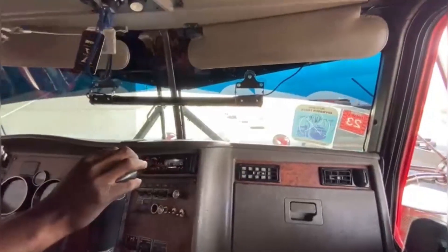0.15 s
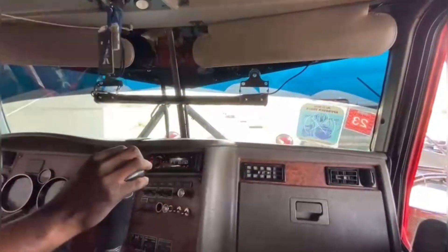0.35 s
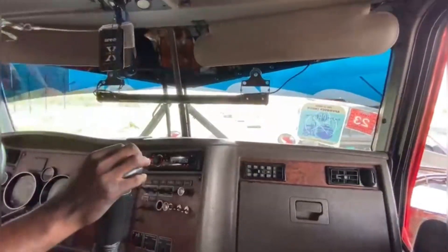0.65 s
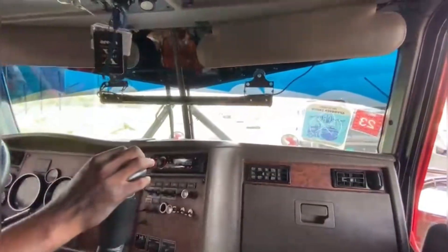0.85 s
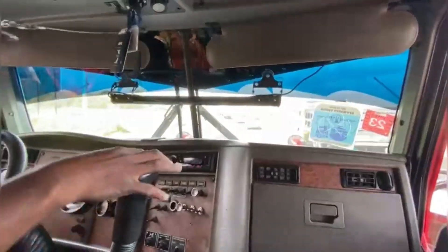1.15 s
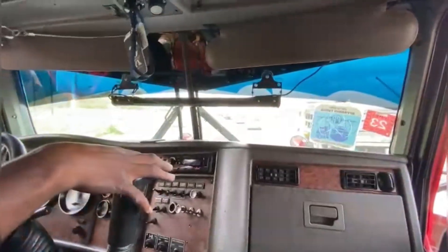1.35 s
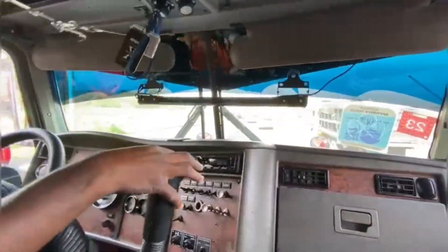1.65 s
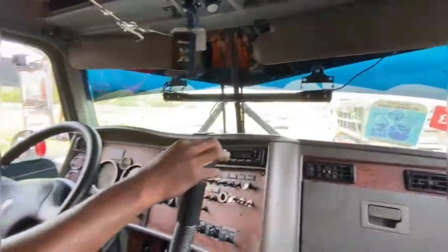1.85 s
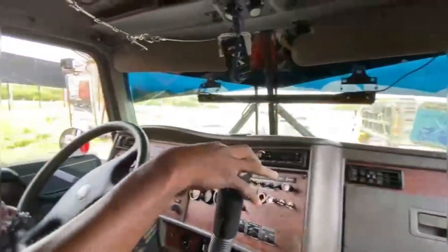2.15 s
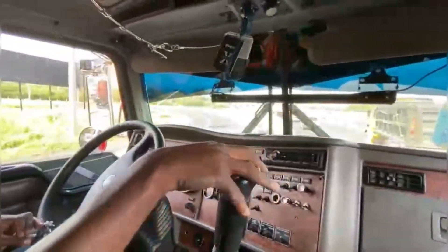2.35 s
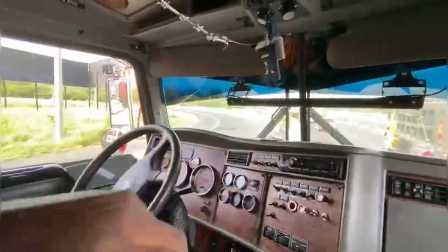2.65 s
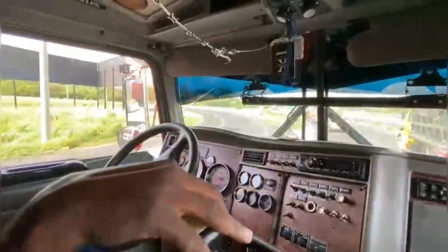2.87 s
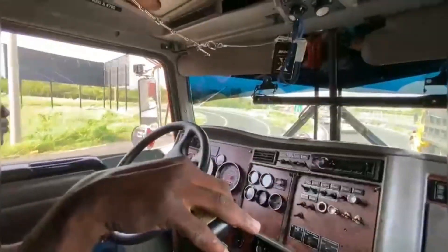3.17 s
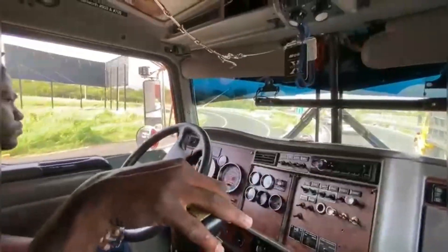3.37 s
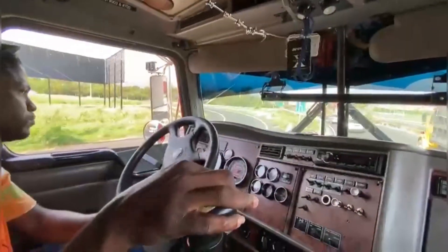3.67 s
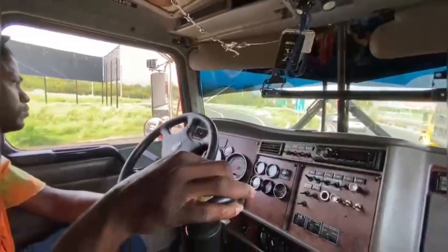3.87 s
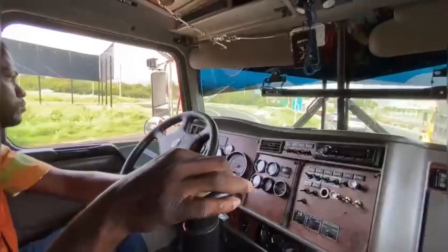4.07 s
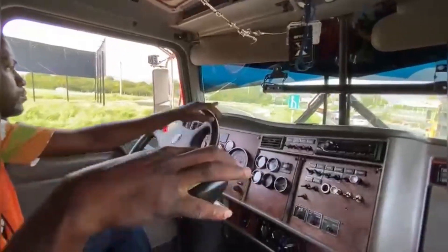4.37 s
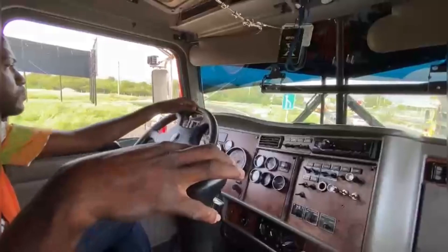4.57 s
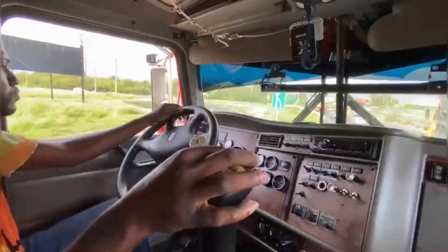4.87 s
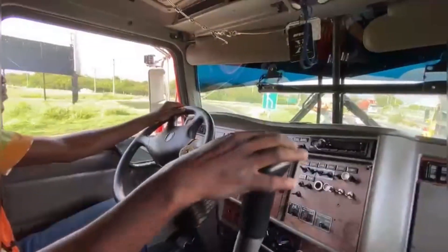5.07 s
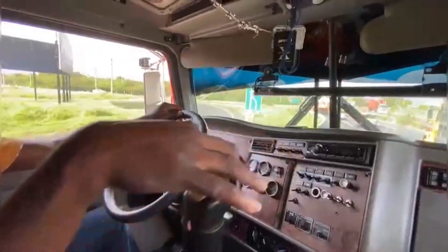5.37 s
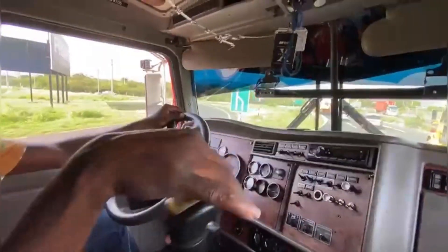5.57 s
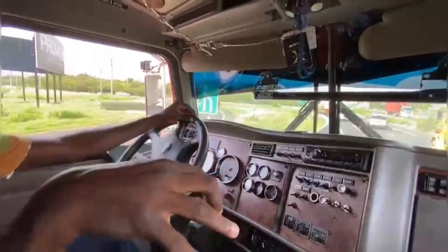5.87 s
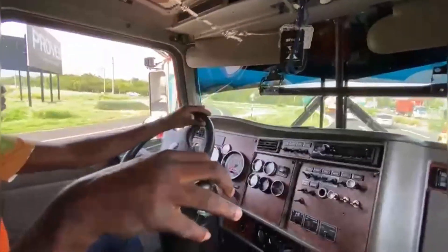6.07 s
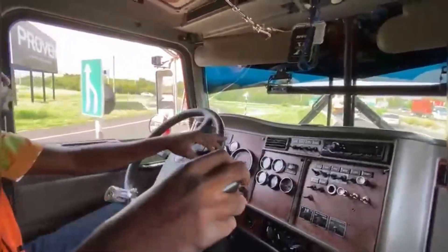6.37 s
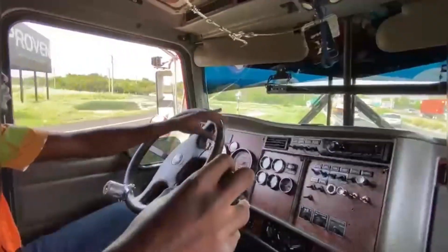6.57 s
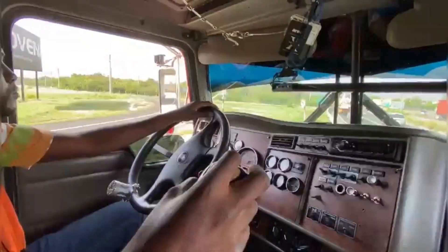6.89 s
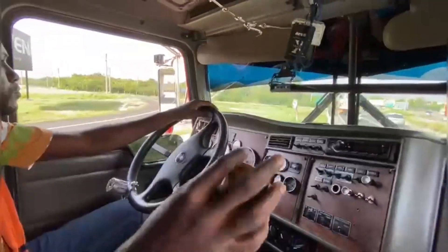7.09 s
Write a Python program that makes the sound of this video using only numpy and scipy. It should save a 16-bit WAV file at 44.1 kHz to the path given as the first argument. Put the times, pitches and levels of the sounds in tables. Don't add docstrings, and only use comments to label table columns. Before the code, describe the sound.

From inside the cab, a heavy diesel truck pulls away through its gears, roaring and booming, with turbo whistle, driveline knocks and air puffs.

```python
import sys
import numpy as np
from scipy import signal
from scipy.fft import rfft, irfft, next_fast_len
from scipy.io import wavfile
from scipy.ndimage import uniform_filter1d, minimum_filter1d

SR = 44100
rng = np.random.default_rng(int(sys.argv[2]) if len(sys.argv) > 2 else 0)


def master_out(mix):
    frames = np.transpose(np.atleast_2d(mix))
    ceiling = np.clip(frames, -1, 1)
    pcm = np.round(ceiling * 32767).astype(np.int16)
    wavfile.write(sys.argv[1], SR, pcm)


def voltage_ratio(level):
    return 10 ** (np.asarray(level, float) / 20)


N = 318843


def rms_one(x):
    return x / np.sqrt(np.mean(np.abs(x) ** 2) + 1e-20)


def in_time(rows):
    s, *columns = np.transpose(rows)
    return [np.interp(np.arange(N) / SR, s, column) for column in columns]


def drift(rate_hz):
    r = np.exp(-80 * np.pi * rate_hz / SR)
    slow = signal.lfilter([1], [1, -2 * r, r * r], rng.standard_normal(N // 40 + 2002))[2000:]
    return np.interp(np.arange(N) / 40, np.arange(len(slow)), rms_one(slow))


def ramp(at_s, length_s):
    reach_s = abs(length_s) * 0.75
    return np.interp(np.arange(N) / SR, [at_s - reach_s, at_s + reach_s], [0, 1])


def held(start_s, length_s, fade_s):
    return ramp(start_s, fade_s) - ramp(start_s + length_s, fade_s)


def spells(rows, fade_s):
    return sum(voltage_ratio(db) * held(s, length, fade_s) for s, length, db in rows)


WALL_ENDS_S = 1.0


def wall_near():
    return 1 - ramp(WALL_ENDS_S, 0.44)


# pitch_hz [Hz], lead_rad [rad]
LEAD = [(0, -1), (350, -1.6), (700, -3.2), (1200, -3.3), (1900, -1.3), (2900, 2.6), (3450, 3.2), (4000, 6),
        (4700, 6.4), (5200, 9.1), (5850, 10), (6300, 12.3), (7000, 12.7), (9000, 22), (10200, 18.8)]
# pitch_hz [Hz], left_minus_right_db [dB]
TILT = [(60, -28), (110, -12), (190, -7), (340, -7.5), (610, -3.5), (1100, -4), (1970, -4), (3520, -2.5),
        (5800, -3), (6600, -0.5), (7400, -11), (9000, -10.5), (11300, -5)]
# pitch_hz [Hz], shared_power [0 to 1]
ALIKE = [(40, 0.37), (125, 0.9), (300, 0.41), (700, 0.44), (2000, 0.15), (2600, 0.39), (4400, 0.52),
         (4850, 0.4), (5500, 0.55), (6550, 0.88), (7300, 0.28), (9000, 0.15), (10300, 1), (11500, 0.28)]


def coloured(spectrum):
    size = next_fast_len(N)
    hz = np.maximum(np.arange(size // 2 + 1) * SR / size, 1)

    def on_log(points):
        point_hz, value = np.transpose(points)
        return np.interp(np.log(hz), np.log(point_hz), value)

    shared, left, right = rfft(rng.standard_normal((3, size))) * voltage_ratio(on_log(spectrum))
    alike = np.clip(on_log(ALIKE), 0, 1)
    lead = np.exp(1j * np.interp(hz, *np.transpose(LEAD)))
    left = voltage_ratio(on_log(TILT)) * (np.sqrt(alike) * shared * lead + np.sqrt(1 - alike) * left)
    right = np.sqrt(alike) * shared + np.sqrt(1 - alike) * right
    pair = irfft([left, right], size)[:, :N]
    return pair / np.sqrt(np.mean(pair.mean(axis=0) ** 2))


def order(turn, level_db, left_db, lead, wander_db, slip, rate):
    angle = turn + slip * drift(rate)
    size = np.sqrt(2) * voltage_ratio(level_db + wander_db * drift(rate))
    left = voltage_ratio(left_db + wander_db * drift(rate)) * np.sin(angle + lead)
    return size * np.array([left, np.sin(angle)])


def whistle(pitch_hz, level_db, width_hz, left_db):
    low = signal.butter(2, width_hz / 2, fs=SR, output="sos")
    band = signal.sosfilt(low, rng.standard_normal((2, N)) + 1j * rng.standard_normal((2, N)))
    tone = (rms_one(band) * np.exp(2j * np.pi * np.cumsum(pitch_hz) / SR)).real
    return np.sqrt(2) * voltage_ratio(level_db) * tone * voltage_ratio([[left_db], [0]])


# firing_multiple [x
# firing rate], start_s [s], length_s [s], lift_db [dB]
ORDER_SPELLS = [(3, 3.62, 0.72, 8), (2, 6.36, 0.23, 10), (5.333, 0.7, 0.27, 15), (4, 5.5, 0.23, 13),
                (4, 1.69, 0.17, 4), (6.333, 6.45, 0.7, 8), (3, 5.6, 0.11, 10.5), (3, 0.8, 0.14, 6),
                (1, 2.885, 0.086, 5.5), (2.667, 1.84, 1.88, 7), (6, 1.8, 0.18, 6), (5, 1.25, 0.52, 7.5),
                (3, 4.38, 0.5, -9.5), (2, 0.816, 0.097, -18), (2, 4.2, 0.41, 3.5), (6.333, 3.3, 0.95, 6),
                (1.667, 4.3, 0.51, 16.5), (4, 5.2, 1.1, 1), (6, 1.45, .4, 3), (6.667, 1.5, 0.29, 11),
                (7, 1.5, 0.2, 13), (6, 3.65, 0.3, 9), (6, 4.1, 0.27, 0), (6, 6.85, .5, 7.5),
                (5, 6.5, .8, 7), (4, 6.9, .4, 5), (3, 6.9, .4, 4), (3.5, 6.25, 0.58, 8),
                (3.667, .6, 0.47, 8.5), (5.333, -0.24, 0.57, 6), (6.333, 4.5, 0.53, 3), (2, 6.7, 0.32, 4.5),
                (3.667, 5, .15, 9), (5, 0, 0.42, -8), (5, 5.5, .4, -8), (6, 4.45, 0.42, -5),
                (4, 0.6, 0.24, -5.5), (5, 2.8, .4, -5), (4, 2.05, .25, 7), (1.5, 1.5, 0.28, 8),
                (2, 0.5, 0.39, 3), (5, 6.12, .15, 9), (7, 3, 0.6, 6), (1, 6.5, 0.18, -5),
                (2.667, 4.5, 0.57, 4), (1, 4.5, 0.071, 4), (1, 3.0, 0.23, -4),
                (6.333, .55, .2, 4), (6.333, 1.2, .7, 4.5), (1.5, 1.78, 0.55, 12), (2.5, 1.82, 0.44, 8),
               (3.5, 1.9, 0.43, 10), (5, 1.75, .3, -9), (5.333, 6.1, .22, 9), (5.333, 6.68, .3, 4),
               (3.333, 8.1, .7, 8), (4, 6.1, .3, 5), (5, 6.9, .2, 6.5), (6, 6.25, .2, 9),
               (4.333, 1.9, .3, 3), (3.333, .6, .5, 2.5),
                (5, 6.15, 1.2, 3), (5, 1.3, .42, 3), (3, 4.1, .27, 2), (4, 1.17, .15, -3), (4, 6.0, .85, 2),
               (3, .88, .18, 3), (4, 3.65, .25, -3), (5.333, 0, .25, 3), (3, 7.0, .3, 2.5),
               (1, 1.98, .2, -2.5), (6, 2.35, .9, -6), (6.333, 2.35, .9, -6)]


def order_lift(multiple):
    return sum(db * held(s, length, fade_s=0.06)
               for m, s, length, db in ORDER_SPELLS
               if round(6 * m) == round(6 * multiple))


# load_share [dB per dB], fuel_share [dB per dB]
FOLLOWS = [(1.19, 0.01), (1.38, 0.18), (0.6, 1.52), (1.1, 0.7), (1.8, 0.41)]
# pitch_hz [Hz], width_hz [Hz], ahead_db [dB], aside_db [dB]
CAB_MODES = [(81.2, 102, -9, -6.5), (123.8, 31.5, -6, 1), (144, 1.8, -18, -25), (163.8, 20, -9, -15.5),
             (180.2, 33, -15, -7.5), (225.8, 20.4, -39, -11), (241.3, 35.3, -22, -12.5),
             (263, 29, -22, -27.5), (300.8, 16.2, -17.5, -17), (327.5, 25, -14.5, -20),
             (356.3, 26.2, -20, -6.5), (443, 130, -25.5, -31.5)]
# left_minus_right_db [dB], left_lead_rad [rad]
AHEAD = [(-11, -1.13), (-15.5, -2.08), (0.5, -1.76), (-12.5, 1), (-8, -2.2)]
# left_minus_right_db [dB], left_lead_rad [rad]
ASIDE = [(-10.5, -1.04), (-5.5, -3), (-5, -1.24), (-12, 1.5), (-7, -2.5)]


def firing(turn, firing_hz, load_db, fuel_db):
    out = 0
    turned = ramp(2.63, 0.73)
    for k, ((load, fuel), ahead, aside) in enumerate(zip(FOLLOWS, AHEAD, ASIDE), start=1):
        size = 0
        for hz, width, ahead_db, aside_db in CAB_MODES:
            facing = voltage_ratio(ahead_db) + (voltage_ratio(aside_db) - voltage_ratio(ahead_db)) * turned
            size = size + facing / (1 + (2 * (k * firing_hz - hz) / width) ** 2) ** 2
        level_db = 20 * np.log10(size) + load * load_db + fuel * fuel_db + order_lift(k)
        left_db, lead = (a + (b - a) * turned for a, b in zip(ahead, aside))
        out = out + order(k * turn, level_db, left_db, lead, wander_db=1.5, slip=0.088, rate=18.6)
    return out


# firing_multiple [x firing rate], level_db [dB], left_minus_right_db [dB], left_lead_rad [rad]
MINOR = [(.5, -40, -10, -.7), (1.5, -33, -9, -.9), (1.667, -36, -11, 2.3), (2.5, -33, -10, -1.7),
         (2.667, -28, -10, -1.7), (2.833, -33, -8, -1.3), (3.333, -33, -10, .8), (3.5, -33, -10, 1.2),
         (3.667, -31, -10, .7), (4.333, -36, -6, 1.4), (4.5, -38, -7, 2.5), (5.333, -33, -9, -2.6),
         (6, -36, -7, -1.5), (6.333, -39, -5, .2), (6.667, -42, -5, .3), (7, -42, -5, -.4)]
# pitch_hz [Hz], width_hz [Hz], lift_db [dB]
BOOMS = [(225, 26, 5), (285, 4, 6.5), (427, 39, 11), (512.7, 52, 10)]


def uneven_cylinders(turn, firing_hz, rumble_db, growl_db):
    out = 0
    for multiple, level_db, left_db, lead in MINOR:
        exact = round(6 * multiple) / 6
        trend_db = rumble_db + 17.0 if multiple < 4 else 1.47 * (growl_db + 17.5) - 3.0
        boom_db = sum(db / (1 + (2 * (exact * firing_hz - hz) / width) ** 2) for hz, width, db in BOOMS)
        total_db = level_db + trend_db + boom_db + order_lift(exact)
        out = out + order(exact * turn, total_db, left_db, lead, wander_db=1.3, slip=0.35, rate=3.0)
    return out


# pitch_hz [Hz], density_db [dB per Hz]
CAB = [(20, -28), (35, -45), (50, 4), (70, 5), (120, 6), (200, -2), (300, 3.5), (380, -5), (500, -36.5)]
BLOCK = [(250, -6.5), (340, 6), (410, 0.5), (460, -1.5), (520, -2.5), (650, -2.5), (835, -6.5), (950, -16),
         (1200, -40.5)]
CLATTER = [(600, -46), (850, 1), (1050, 5.5), (1220, 3.5), (2100, -2), (2600, -4.5), (2950, -7),
           (3600, -128)]
INTAKE = [(2300, -45.5), (3000, 3.5), (3560, 2), (4460, -2), (5100, -4), (5420, -7), (5750, -2), (6100, -8),
          (6500, -3.5), (7100, -3.5), (7650, -8), (8300, -3.5), (10000, -14), (11500, -65), (11850, -53)]
# start_s [s], length_s [s], lift_db [dB]
SURGES = [(1.55, 0.4, -0.5), (3.9, 0.035, -0.5), (6.45, 0.57, 1), (4.4, 0.22, 0), (5.6, 0.31, -0.5),
          (2.45, .5, -1.5), (3.03, 0.083, 1.5), (3.13, .1, -1.5), (4.58, .06, 2)]


def body_noise(turn, rumble_db, growl_db, fuel_db):
    wall = wall_near()
    clatter_db = -32.5 + 0.42 * fuel_db + 5 * wall
    clatter_db += sum(db * held(s, length, fade_s=0.066) for s, length, db in SURGES)
    hiss_db = -37 + 0.6 * fuel_db + 3 * wall
    layers = [(CAB, rumble_db - 9, 0, 1.5), (BLOCK, growl_db - 5.5, 0.1, 1.2),
              (CLATTER, clatter_db, 0.1, 0.6), (INTAKE, hiss_db, 0.06, 0.9)]
    out = 0
    for spectrum, level_db, beat_depth, flicker_db in layers:
        beat = 1 + beat_depth * (np.cos(turn) + np.cos(turn / 3))
        out = out + voltage_ratio(level_db + flicker_db * drift(17.0)) * beat * coloured(spectrum)
    return out


# time_s [s], pitch_hz [Hz], level_db [dB]
TURBO = [(0, 4950, -37), (.5, 5800, -39), (1.25, 7030, -43.5), (1.7, 8150, -46), (2.2, 9300, -56),
         (2.3, 8750, -46), (2.42, 8250, -38.5), (2.55, 7850, -45), (2.7, 7150, -45), (2.92, 6850, -42),
         (3.15, 6550, -45), (3.55, 6550, -47), (3.7, 7000, -55), (3.8, 7800, -54), (4.5, 8150, -49),
         (5.03, 8400, -50), (5.09, 7100, -44), (5.25, 6700, -42), (5.6, 6300, -49), (6.1, 6150, -65),
         (6.35, 6650, -38.5), (7.23, 8070, -45)]


def turbo():
    pitch_hz, level_db = in_time(TURBO)
    return voltage_ratio(3) * whistle(pitch_hz, level_db, width_hz=520, left_db=-10)


# pitch_hz [Hz], width_hz [Hz], level_db [dB]
WALL_BANDS = [(2062, 690, -25.5), (825.5, 130, -27.5), (3454, 390, -35), (4650, 760, -38)]


def wall_echo():
    bands = sum(whistle(np.full(N, hz), db + 0.8 * drift(12.0), width, left_db=-2.5)
                for hz, width, db in WALL_BANDS)
    return wall_near() * bands


# time_s [s], level_db [dB], rise_s [s], fall_s [s]
PUFFS = [
    (1.97, -33, 0.014, 0.049),
    (4.61, -44, .01, 0.026),
    (6.6, -44, .01, 0.017),
    (6.915, -28.5, 0.018, 0.046),
    (6.972, -23.5, 0.0057, 0.026),
]
# pitch_hz [Hz], density_db [dB per Hz]
VALVE = [(2000, -30), (3400, -12), (4650, 4.5), (5700, -13), (6600, -1.5), (8300, -5.5), (10300, -4),
         (11700, -12)]


def air_valves():
    t, shape = np.arange(N) / SR, np.zeros(N)
    for s, level_db, rise, fall in PUFFS:
        shape += voltage_ratio(level_db) * np.exp(-np.abs(t - s) / np.where(t < s, rise, fall))
    return shape * coloured(VALVE) * voltage_ratio([[-5], [1.5]])


# time_s [s], peak_db [dB]
KNOCKS = [(2.993, -35), (3.04, -27), (3.073, -16.5), (3.105, -21), (3.148, -36), (3.17, -26), (3.222, -40)]
# pitch_hz [Hz], level_db [dB], t60_s [s]
CASING = [(680, -4.5, 0.082), (857, -3.5, 0.059), (1054, 0.5, 0.096), (1255, -3, 0.047)]


def knocks():
    out, strengths_db = np.zeros(N), rng.normal(0, 2.1, (len(KNOCKS), len(CASING)))
    t = np.arange(4000) / SR
    for (s, peak_db), own_db in zip(KNOCKS, strengths_db):
        ring = sum(voltage_ratio(db + extra - 60 * t / t60) * np.sin(2 * np.pi * hz * t)
                   for (hz, db, t60), extra in zip(CASING, own_db))
        soft_onset = 1 - np.exp(-t / 0.0023)
        out[round(s * SR):][:len(t)] += voltage_ratio(peak_db - 4.0) * ring * soft_onset
    return out * voltage_ratio([[0], [-4]])


# start_s [s], length_s [s], level_db [dB]
SQUEAK = [(0, 1.1, -44.5), (1.35, 0.37, -50), (3.51, .06, -39), (3.6, 0.12, -44), (3.74, 0.11, -39.5),
          (3.84, 0.09, -48), (4.0, 0.14, -44), (4.15, .2, -48), (4.385, 0.16, -45), (4.7, 0.055, -47)]


def squeak():
    turn = 2 * np.pi * 3494 * np.arange(N) / SR
    tone = order(turn, level_db=-3, left_db=-1, lead=0, wander_db=3.0, slip=0.9, rate=18.0)
    return spells(SQUEAK, fade_s=0.014) * tone


# pitch_hz [Hz], width_hz [Hz], start_s [s], length_s [s], level_db [dB]
NOISE_BANDS = [(706, 150, 3.65, 0.64, -41), (724, 160, 4.5, .5, -42), (1060, 240, 4.4, .5, -41.5),
               (1090, 200, 3.75, .6, -45), (1500, 290, 3.22, .06, -41), (1400, 270, 4.55, .5, -46),
               (1480, 300, 6.85, .15, -47), (1310, 300, 5.7, .1, -41), (6360, 500, .55, 0.46, -48),
               (8500, 1300, 1.5, .5, -54), (8560, 1200, 6.8, .62, -50), (1120, 200, 5.1, .14, -41)]


def trim():
    out, shake = np.zeros((2, N)), rng.standard_normal(N) * voltage_ratio(3.0 * drift(20.0))
    for hz, width, s, length, db in NOISE_BANDS:
        resonance = signal.butter(2, [hz - width / 2, hz + width / 2], "band", fs=SR, output="sos")
        buzz = rms_one(signal.sosfilt(resonance, shake))
        out += buzz * spells([(s, length, db + 6)], fade_s=0.055)
    return out * voltage_ratio([[-3], [0]]) * [[-1], [1]]


# time_s [s], peak_db [dB], pitch_hz [Hz]
GUSTS = [(0.714, -10, 330), (1.819, -6.5, 254), (2.25, -16.5, 48), (2.422, -20, 55), (2.937, -10.5, 138),
         (3.033, -13, 127), (3.074, -8, 285), (3.104, -9.5, 180), (3.18, -12.5, 85), (3.297, -14, 258),
         (4.731, -15, 128), (4.39, -21, 300), (4.54, -14, 90), (4.995, -9, 228), (5.076, -13.5, 117),
         (5.197, -13, 183), (5.229, -10.5, 160), (5.258, -8.5, 123.7), (5.294, -16, 146), (5.403, -6, 80),
         (5.26, -11, 347), (5.41, -13, 330), (2.975, -18, 80.2), (3.13, -15, 131), (2.151, -8.5, 143),
         (5.52, -23, 86), (6.301, -20, 97), (6.397, -13, 122.4)]
# start_s [s], length_s [s], level_db [dB]
DRAUGHT = [(2.12, 0.12, -15.5), (2.8, 0.46, -23), (5.05, 0.61, -23), (5.7, 0.95, -25.5), (6.7, 0.16, -21)]


def draughts():
    out, (rough, air) = np.zeros(N), rng.standard_normal((2, N))
    around = np.arange(-2000, 2000)
    t = around / SR
    for (s, peak_db, hz), phase in zip(GUSTS, rng.uniform(0, 2 * np.pi, len(GUSTS))):
        swell = np.exp(-(t * hz / 1.1) ** 2)
        out[round(s * SR) + around] += voltage_ratio(peak_db + 2.0) * swell * np.sin(2 * np.pi * hz * t + phase)
    edge = signal.sosfilt(signal.butter(4, 500, fs=SR, output="sos"), rough)
    buffet = signal.sosfilt(signal.butter(1, [40, 170], "band", fs=SR, output="sos"), air)
    buffet = signal.sosfilt(signal.butter(2, 450, fs=SR, output="sos"), buffet)
    calm_and_spells = voltage_ratio(-40) + spells(DRAUGHT, fade_s=0.13)
    buffet = calm_and_spells * voltage_ratio(3.0 * drift(15.0)) * rms_one(buffet)
    return (out * (1 + 0.41 * rms_one(edge)) + buffet) * voltage_ratio([[0], [-12]])


# time_s [s], firing_hz [Hz]
SPEED = [(0, 64.6), (.7, 74.5), (1.26, 81.3), (1.82, 89.3), (2.1, 92.9), (2.25, 93.2), (2.4, 88), (2.8, 77),
         (2.95, 79.3), (3.3, 78.8), (4.2, 82.2), (4.9, 86.3), (5.06, 85.5), (5.45, 72), (5.85, 75.8),
         (6.44, 78.8), (6.72, 81), (7.23, 84)]
# time_s [s], level_db [dB]
LOAD = [(0, -0.5), (2.05, -2), (2.24, -6.5), (2.4, -24), (2.55, -17.5), (2.8, -12), (2.94, -8.5), (3.1, -4),
        (3.25, -8.5), (3.5, -18), (3.65, -13), (4.4, -8.5), (4.62, -10.5), (4.9, -5), (5.05, -10.5),
        (5.3, -24), (5.45, -3.5), (7.23, -3.5)]
# time_s [s], level_db [dB]
FUEL = [(0, 1.5), (.75, 1.5), (1.25, -1), (1.8, 4), (2.0, -1.5), (2.4, -7.5), (2.95, -8.5), (3.45, -9),
        (3.8, -2.5), (4.5, -3), (4.9, -1.5), (5.2, -5), (5.65, -7.5), (6.0, -5.5), (6.2, 0), (6.8, 1.5),
        (7.0, -2), (7.23, -0.5)]


def scene():
    (firing_hz,), (load_db,), (fuel_db,) = in_time(SPEED), in_time(LOAD), in_time(FUEL)
    rumble_db = -19.5 + 0.28 * fuel_db + 0.11 * load_db
    growl_db = -19 + fuel_db
    turn = 2 * np.pi * np.cumsum(firing_hz) / SR
    engine = firing(turn, firing_hz, load_db, fuel_db)
    engine = engine + uneven_cylinders(turn, firing_hz, rumble_db, growl_db)
    engine = engine + body_noise(turn, rumble_db, growl_db, fuel_db)
    air = turbo() + wall_echo() + air_valves()
    return engine + air + knocks() + squeak() + trim() + draughts()


def noise_gate(pair, patch_db, bin_db, from_hz, bin_from_hz, size):
    hz, _, cells = signal.stft(pair, SR, window="cosine", nperseg=2048)
    power = np.abs(cells) ** 2 + 1e-20
    patch = 10 * np.log10(uniform_filter1d(uniform_filter1d(power, size=size, axis=1), size=2, axis=2))
    around = uniform_filter1d(patch, size=44, axis=1) + np.log2(hz[:, None] / from_hz + 1e-9) / 2
    kept = minimum_filter1d(minimum_filter1d(patch >= around + patch_db, size=7, axis=1), size=2, axis=2)
    weak_patch = ~kept & (hz[:, None] > from_hz)
    weak_bin = 10 * np.log10(power) < patch + bin_db
    cells = cells * ~((weak_patch | weak_bin) & (hz[:, None] > bin_from_hz))
    return signal.istft(cells, SR, window="cosine", nperseg=2048)[1][:, :N]


# start_s [s], length_s [s], low_hz [Hz], high_hz [Hz]
MUTES = [(2.29, .04, 9600, 10300), (2.32, .1, 9050, 9750), (2.35, .03, 10300, 10900),
         (2.38, .11, 8700, 9000), (2.91, .03, 9200, 10400), (.6, .08, 2850, 3050), (.08, .05, 1000, 1200),
         (.33, .03, 1150, 1350), (1.01, .09, 900, 1000), (1.33, .06, 2950, 3200), (1.48, .06, 2650, 2950),
         (1.6, .2, 3200, 3400), (1.805, .03, 2900, 3700), (1.94, .08, 2900, 3500), (2.03, .05, 3200, 3500),
         (2.45, .05, 1050, 1250), (2.53, .05, 1600, 1750), (2.56, .2, 1250, 1350), (2.66, .04, 850, 950),
         (2.96, .03, 640, 760), (2.955, .02, 1000, 1200), (2.9, .03, 1150, 1450), (2.995, .025, 540, 640),
         (3.11, .05, 540, 700), (3.11, .03, 1100, 1250), (5.13, .03, 850, 1000), (5.4, .04, 1400, 1500),
         (5.47, .06, 1250, 1400), (6.43, .05, 10000, 10400), (3.19, .04, 780, 950), (3.53, .04, 1400, 1560),
         (4.18, .05, 840, 960), (6.28, .07, 850, 1000), (6.32, .08, 2950, 3200), (6.43, .03, 3000, 3600),
         (6.5, .05, 3200, 3400), (1.66, .07, 880, 980), (2.75, .25, 2900, 3100)]
# low_hz [Hz], high_hz [Hz], muted_share [0 to 1]
FLICKERS = [(5220, 5620, .5), (5900, 6150, .22), (7550, 7750, .2), (3200, 3400, .1)]


def mute_bands(pair):
    hz, s, cells = signal.stft(pair, SR, window="cosine", nperseg=1024)
    chance = uniform_filter1d(rng.standard_normal((len(FLICKERS), len(s))), size=3, axis=1)
    for start, length, low, high in MUTES:
        cells[:, (hz > low) & (hz < high)] *= (s < start) | (s > start + length)
    for (low, high, share), luck in zip(FLICKERS, chance):
        sounding = (luck > np.quantile(luck, share)) | (s < WALL_ENDS_S * 0.75)
        cells[:, (hz > low) & (hz < high)] *= sounding
    return signal.istft(cells, SR, window="cosine", nperseg=1024)[1][:, :N]


def band_limit(x):
    return signal.sosfilt(signal.butter(12, 11870, fs=SR, output="sos"), x)


def record(dry):
    swap = np.array([[1, 1], [1, -1]]) / np.sqrt(2)
    rounded = 1.15 * np.tanh(dry / 1.15)
    thinned = noise_gate(swap @ rounded, patch_db=-4.2, bin_db=-2.0, from_hz=850, bin_from_hz=500, size=12)
    ports = mute_bands(swap @ thinned)
    ports = noise_gate(ports, patch_db=-8.0, bin_db=-3.5, from_hz=2500, bin_from_hz=1250, size=12)
    return band_limit(np.clip(ports, -1, 1))


dry = scene()
out = record(dry)
master_out(out)
```